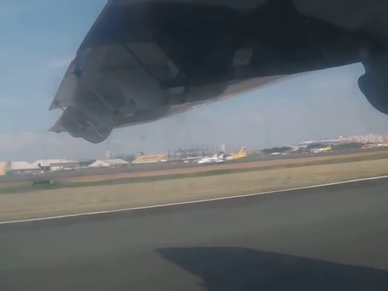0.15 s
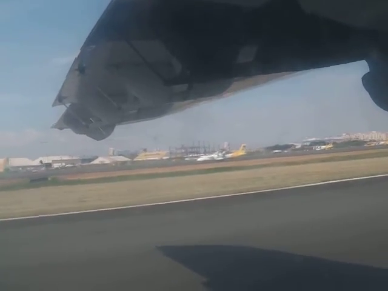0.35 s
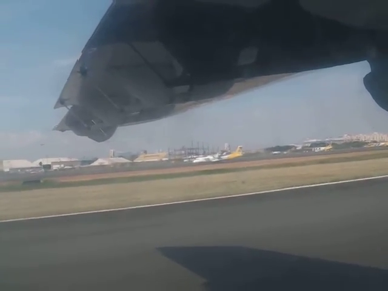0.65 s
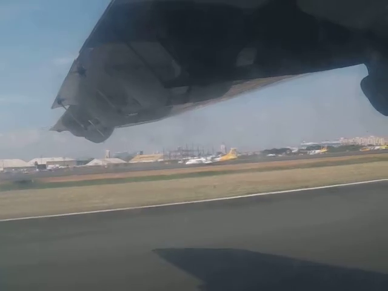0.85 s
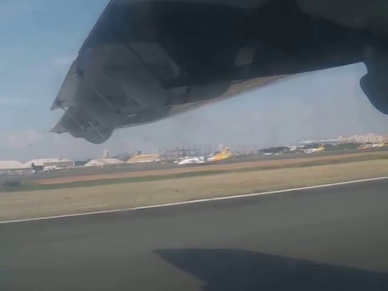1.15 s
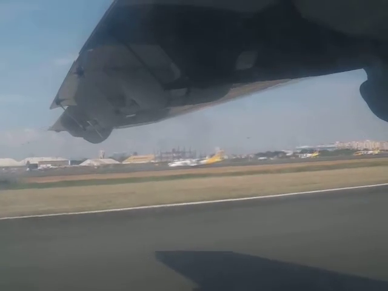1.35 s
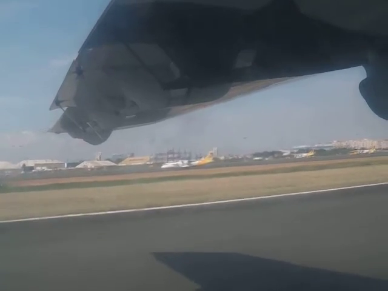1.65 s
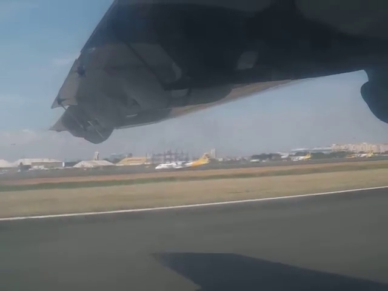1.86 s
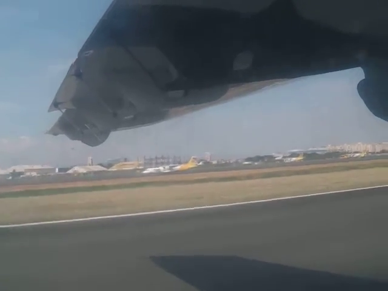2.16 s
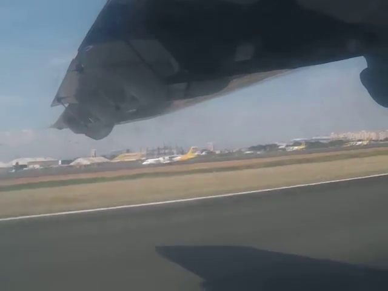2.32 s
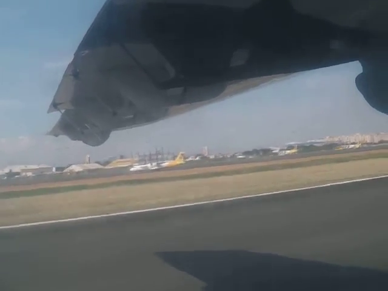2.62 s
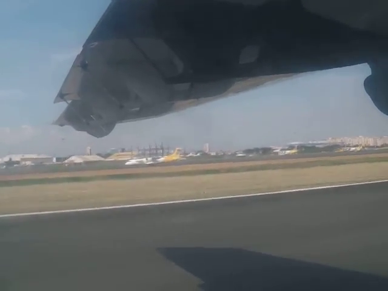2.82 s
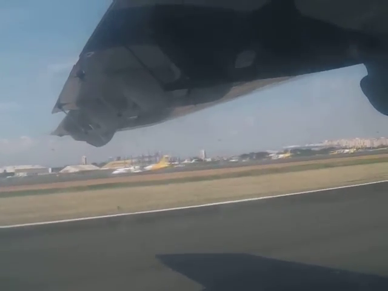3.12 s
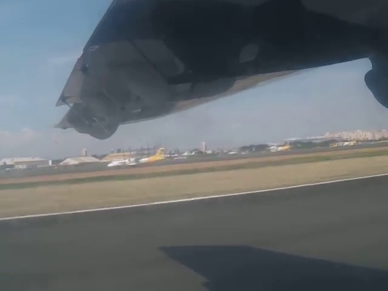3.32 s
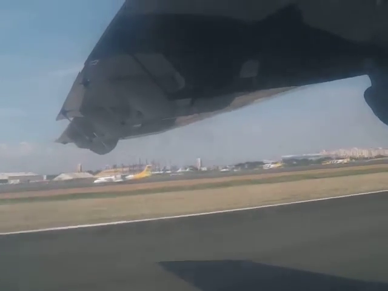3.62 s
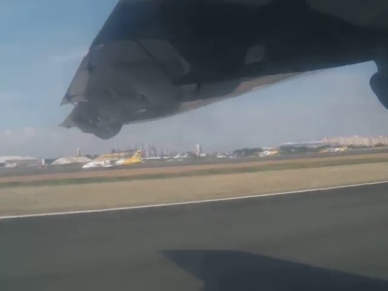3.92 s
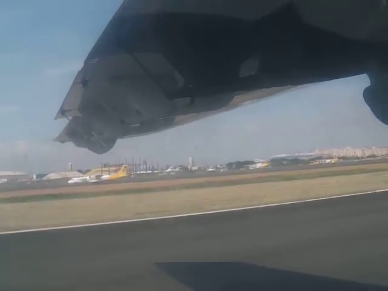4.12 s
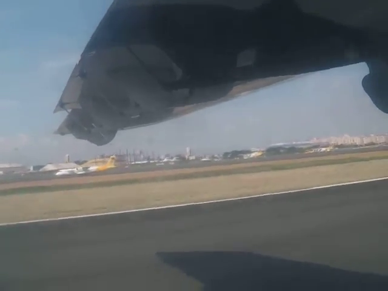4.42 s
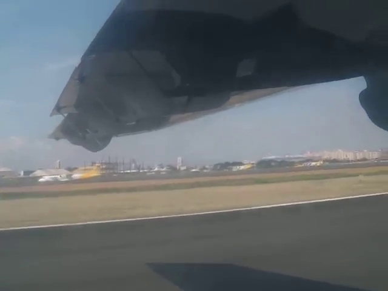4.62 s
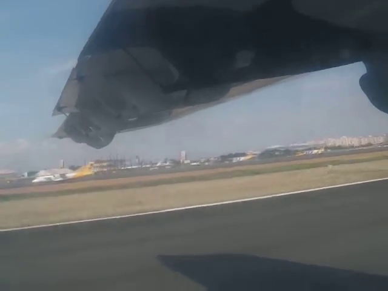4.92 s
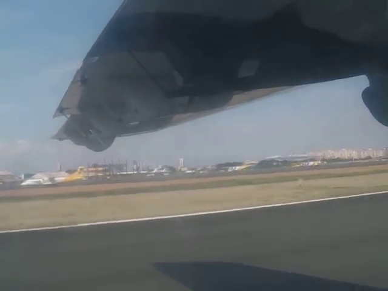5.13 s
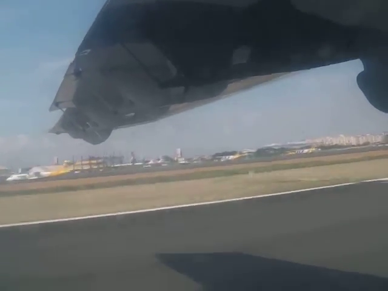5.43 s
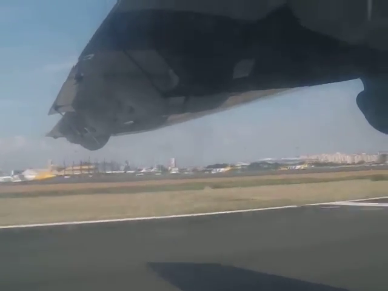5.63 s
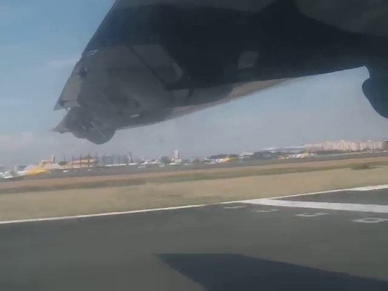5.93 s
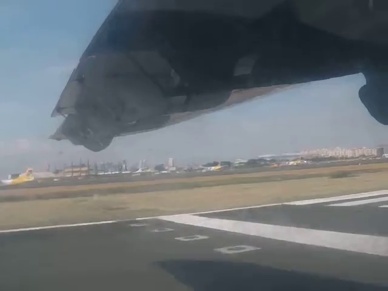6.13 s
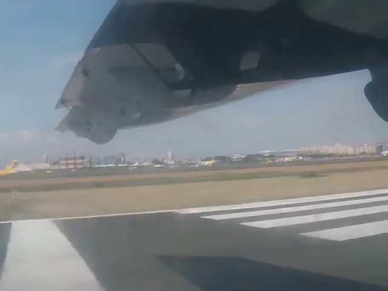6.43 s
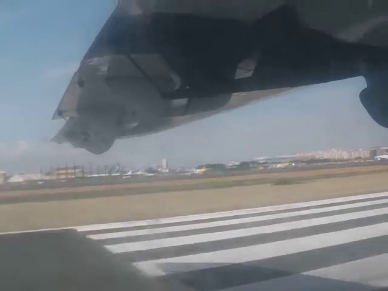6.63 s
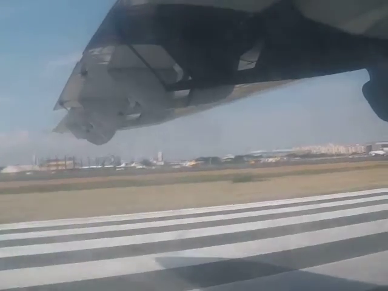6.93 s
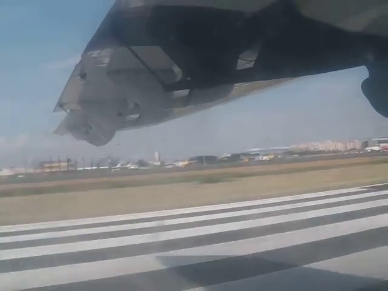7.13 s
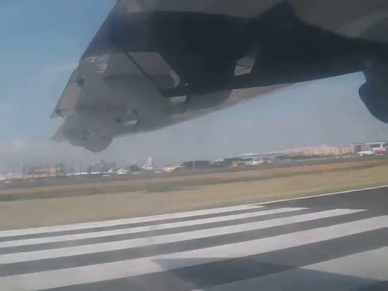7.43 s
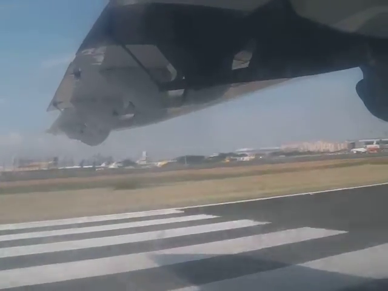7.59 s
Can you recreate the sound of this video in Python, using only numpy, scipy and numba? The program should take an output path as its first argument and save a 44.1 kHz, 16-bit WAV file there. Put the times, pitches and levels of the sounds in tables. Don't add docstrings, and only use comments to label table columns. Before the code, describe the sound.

A loud, continuous propeller drone fills an aircraft cabin, swelling and fading in a regular throb. Wheel bumps stir the low rumble and shake the panels at uneven intervals. Above sit breathy air noise and a rough, very high whine that rises slightly, sags through the turn, then settles. A single click falls near the start. The handheld camera's automatic level pumps and nearly overloads; bass is central, treble wide.

```python
import sys
import numpy as np
from scipy import signal
from scipy.fft import rfft, irfft, next_fast_len
from scipy.io import wavfile
from scipy.ndimage import uniform_filter1d, map_coordinates
from numba import njit

SR = 44100
rng = np.random.default_rng(int(sys.argv[2]) if len(sys.argv) > 2 else 0)


def linear_from_db(decibels):
    return 10 ** (np.asarray(decibels, float) / 20)


def dump(signal):
    limited = np.clip(np.atleast_2d(signal).T, -1, 1)
    pcm = np.round(limited * 32767).astype(np.int16)
    wavfile.write(sys.argv[1], SR, pcm)


N = 342216
T_S = np.arange(N) / SR
MID_TURN_S = 3.9


def unit(x):
    return x / np.sqrt(np.mean(x ** 2) + 1e-20)


def curves(rows):
    t_s, *columns = np.transpose(rows)
    return [np.interp(T_S, t_s, column) for column in columns]


def wobble(rate_hz):
    knots = rng.standard_normal(int(N * rate_hz / SR) + 4)
    return map_coordinates(knots, [np.arange(N) * rate_hz / SR])


def filtered(x, response):
    m = next_fast_len(N + 8192)
    spectrum = rfft(x, m) * response(np.fft.rfftfreq(m, 1 / SR))
    return irfft(spectrum, m)[..., :N]


def resonance(f, centre_hz, width_hz):
    return 1j * f * width_hz / (centre_hz * centre_hz - f * f + 1j * f * width_hz)


def shape(points):
    hz, db = np.transpose(points)
    return lambda f: linear_from_db(np.interp(np.log(f + 1), np.log(hz + 1), db, -120, -120))


def rush(response, patchy_db):
    z = signal.stft(rng.standard_normal(N), nperseg=512)[2]
    field = uniform_filter1d(rng.standard_normal(z.shape), 6, 0)
    field = unit(uniform_filter1d(field, 14, 1))
    noise = signal.istft(z * linear_from_db(patchy_db * field), nperseg=512)[1][:N]
    return unit(filtered(noise, response))


def jolt_marks(column=1):
    # t/s, strength/dB, lowering of the gain control's sensed level around the jolt/dB
    jolts = [(0.266, 4, 5), (0.337, 2.5, -0.5), (.589, 4, 3.3), (0.956, 8.5, 9.5), (1.36, 5, 3.5),
             (1.696, 3, 5), (1.813, 3.5, 3), (1.97, 8.5, 8.5), (2.396, 4.5, 4), (2.623, 6, 5.5),
             (3.222, 3.5, 4), (3.343, 3, 2), (3.51, 4, 2.5), (3.863, 5, 6.5), (4.085, 1.5, 2.5),
             (4.32, 3, -0.4), (4.475, 5, 4.5), (4.915, 6, 3.5), (4.987, 6, 5), (5.41, 3, 1),
             (5.537, 4.5, 10), (5.776, 6, 8), (5.953, 3.5, 0.5), (6.166, 3, 7), (6.452, 4, 10),
             (6.586, 4, 5), (6.963, 4, 3), (7.274, 4.5, 3), (7.585, 5, 4), (7.721, 7, 3)]
    rows = np.array(jolts)
    return np.bincount((rows[:, 0] * SR).astype(int), rows[:, column], N)[:N]


def surges(length_s):
    return signal.fftconvolve(jolt_marks(), np.hanning(round(length_s * SR)), "same")


def drift_db():
    return 0.85 * wobble(1.3)


def rumble():
    # f/Hz, density/(dB per Hz)
    roar_density = [(15, -22.5), (30, -10.5), (60, -11), (80, -6), (105, -2.5), (145, -1.5), (180, -9.5),
                    (215, -15.5), (300, -15), (600, -33), (900, -75)]
    level_db = drift_db() - 19.0 + 0.47 * surges(0.043)
    return linear_from_db(level_db) * rush(shape(roar_density), patchy_db=0.15)


def panels():
    # f/Hz, width/Hz, level/dB
    modes = [(353, 83, -9.5), (397, 60.6, 0.5), (501.4, 68, -1), (529.8, 70, 0), (613, 65, -12.5)]

    def walls(f):
        return np.sqrt(sum(linear_from_db(2 * db) * np.abs(resonance(f, hz, width_hz)) ** 4 for hz, width_hz, db in modes))

    level_db = drift_db() - 17 + 0.7 * surges(0.035)
    return linear_from_db(level_db) * rush(walls, patchy_db=0.5)


def vent():
    # t/s, level/dB
    whistle_levels = [
        (0, -46),
        (2.4, -46),
        (2.8, -46.5),
        (5.1, -46),
        (7.76, -46),
    ]
    return linear_from_db(curves(whistle_levels)[0]) * rush(lambda f: resonance(f, 2316, 22) ** 2, patchy_db=0.5)


def hiss():
    # f/Hz, density/(dB per Hz)
    mid_density = [(400, -23.5), (680, -5), (820, -5.5), (1050, -4.5), (1400, -10), (1550, -13.5),
                   (1750, -14), (2200, -16), (2720, -13.5), (2850, -20.5), (3300, -24), (7200, -26),
                   (9500, -31.5), (12400, -60)]
    # f/Hz, density/(dB per Hz)
    side_density = [(120, -13), (200, 4), (267, -21), (401, -3), (463, -10), (527, -1), (650, -6.5),
                    (1160, -15.5), (1630, -17), (2370, -6), (4980, -21), (6450, -13), (9500, -16),
                    (12400, -45), (20900, -120)]
    mid = linear_from_db(-29.0) * rush(shape(mid_density), patchy_db=1.04)
    side = linear_from_db(-38.0) * rush(shape(side_density), patchy_db=0.5)
    return mid, side


def intake(near):
    # f/Hz, density/(dB per Hz)
    mid_density = [(5300, -31), (9000, -19.5), (10000, -12.5), (10850, -3), (11500, 2.5), (12200, -4.5),
                   (12800, -8), (14300, -18), (15800, -29)]
    # f/Hz, density/(dB per Hz)
    side_density = [(5300, -45), (9000, -23), (9700, -16), (11000, -0.5), (11800, -0.5), (12600, -4),
                    (13200, -8), (14600, -25), (15800, -24)]
    fade_db = -0.19 * (T_S - MID_TURN_S)
    chop_db = 0.35 * np.sin(near) + 0.46 * np.sin(2 * near)
    gain = linear_from_db(drift_db() + fade_db + chop_db)
    mid = linear_from_db(-36.0) * gain * rush(shape(mid_density), patchy_db=2.0)
    side = linear_from_db(-34.0) * gain * rush(shape(side_density), patchy_db=-4.0)
    return mid, side


def whine(near):
    # t/s, f/Hz
    pitch = [(0, 11890), (.5, 11881), (.87, 11862), (1.25, 11888), (1.9, 11960), (2.25, 11960),
             (2.75, 11921), (3.35, 11898), (4, 11808), (5.2, 11752), (6.3, 11783), (7.05, 11801),
             (7.76, 11805)]
    # blade multiple, mid-turn level/dB, drift/(dB/s)
    comb = [(-6, -49.1, .1), (-5, -50.1, -.4), (-4, -53.1, -.4), (-3, -38.6, .9), (-2, -46.6, -.3),
            (-1, -44.1, -.6), (0, -43.1, -.4), (1, -40.1, .2), (2, -49.1, -1.3), (3, -47.1, .1),
            (4, -46.1, .7), (5, -55.1, .3), (6, -59.1, -.9), (7, -61.1, 0)]
    carrier = 2 * np.pi * np.cumsum(curves(pitch)[0] + 2.5 * wobble(14)) / SR
    out = np.zeros((2, N))
    for k, mid_db, drift_db_s in comb:
        level_db = mid_db + drift_db_s * (T_S - MID_TURN_S) + 4.5 + 2.4 * wobble(3)
        start_rad = rng.uniform(0, 2 * np.pi)
        for port, lag_rad in enumerate((1.05, -1.05)):
            flicker = linear_from_db(level_db + 1.2 * wobble(5))
            phase = carrier + round(k) * near + start_rad + lag_rad + 0.25 * wobble(3)
            out[port] += flicker * np.sin(phase)
    return out


def blade_angles():
    # t/s, mean blade rate of the pair f/Hz
    cancellations = [(-.33, 105.6), (.26, 105.65), (.82, 105.65), (1.38, 105.85), (1.96, 106.2),
                     (2.56, 106.2), (3.22, 105.85), (3.77, 105.4), (4.33, 105.0), (4.85, 104.65),
                     (5.34, 104.6), (5.74, 104.8), (6.14, 104.9), (6.51, 104.9), (6.85, 104.8),
                     (7.23, 104.7), (7.63, 104.65), (8.03, 104.6)]
    t_s = np.transpose(cancellations)[0]
    slip = np.interp(T_S, t_s, np.arange(len(t_s)) + 0.5)
    slip = uniform_filter1d(slip, SR // 4, mode="nearest")
    mean = np.cumsum(curves(cancellations)[0]) / SR
    return 2 * np.pi * (mean + slip / 2), 2 * np.pi * (mean - slip / 2)


def propellers(near, far):
    # t/s, near level/dB, far minus near/dB, far overtone level/dB
    blade_levels = [
        (0, -11, 0.4, -63),
        (1, -13, -0.5, -27),
        (2, -11.5, 0.5, -33),
        (3, -12.5, 4.3, -33.5),
        (4, -10.5, -1, -32.5),
        (5, -9.5, 1, -27.5),
        (5.9, -9, -7, -34),
        (6.8, -12, -0.5, -34),
        (7.76, -10, 1.5, -36),
    ]
    near_db, far_db, over_db = curves(blade_levels)
    near_tone = linear_from_db(near_db + 0.24 * wobble(6.5)) * np.sin(near)
    far_tone = linear_from_db(near_db + far_db + 0.54 * wobble(9.8)) * np.sin(far)
    overtone = linear_from_db(over_db + 0.5 * wobble(3.8)) * np.sin(2 * far)
    return near_tone + far_tone + overtone


def scene():
    # f/Hz, left minus right/dB
    lean_points = [(30, -0.43), (110, -0.75), (380, 0.23), (1290, -1.5), (2380, 2.5), (4400, 0),
                   (8120, 1.5), (10800, -2), (12500, 1), (15000, -2)]
    near, far = blade_angles()
    hiss_mid, hiss_side = hiss()
    intake_mid, intake_side = intake(near)
    mid = hiss_mid + vent() + intake_mid
    side = hiss_side + intake_side
    air = np.array([mid + side, mid - side])
    cabin = rumble() + panels() + air + whine(near) + propellers(near, far)
    hz, db = np.transpose(lean_points)
    return filtered(cabin, lambda f: linear_from_db(np.interp(f, hz, db) * [[0.5], [-0.5]]))


@njit
def follower(level, attack, release):
    out, held = np.empty_like(level), level[0]
    for i in range(len(level)):
        held += (attack if level[i] > held else release) * (level[i] - held)
        out[i] = held
    return out


@njit
def sawtooth(level_db, jolt_db, trip_db, extra_db, climb_db):
    out, gain = np.empty_like(level_db), 0.
    for i in range(len(level_db)):
        gain += climb_db - jolt_db[i]
        over = level_db[i] + gain - trip_db
        if over > 0:
            gain -= over + extra_db
        out[i] = gain
    return out


def gain_control(dry):
    trip_db, overshoot_db, recovery_db_s = -2, 2.22, 40
    duck_s, lull_s = 0.0029, 0.16
    level_db = 20 * np.log10(uniform_filter1d(np.abs(dry).max(0), size=20) + 1e-9)
    lull_db = signal.fftconvolve(jolt_marks(column=2), np.hanning(round(lull_s * SR)), "same")
    gain_db = sawtooth(level_db - lull_db, jolt_marks(), trip_db, overshoot_db, recovery_db_s / SR)
    lag = round(duck_s * SR)
    gain_db = uniform_filter1d(gain_db, lag, mode="nearest", origin=lag // 2 - 1)
    return dry * linear_from_db(gain_db + 0.5)


def limiter(x):
    attack_s, release_s = 0.0013, 0.045
    held = follower(np.abs(x).max(0), 1 / (attack_s * SR), 1 / (release_s * SR))
    return x * np.minimum(1, 0.66 / (held + 1e-9))


def low_pass(x):
    return signal.sosfilt(signal.butter(12, 15640, fs=SR, output="sos"), x)


def record(dry):
    # f/Hz, width/Hz
    notch = (7900, 300)
    # t/s, step level/dB
    ticks = [
        (.769, -1.5),
    ]
    x = gain_control(dry)
    x = filtered(x, lambda f: (1 - resonance(f, *notch)) ** 2)
    x = limiter(x)
    for t_s, step_db in ticks:
        start = round(t_s * SR)
        x[:, start:start + 400] -= linear_from_db(step_db) * np.exp(-np.arange(400) / 30.5)
    return low_pass(np.clip(x, -1, 1))


dry = scene()
out = record(dry)
dump(out)
```